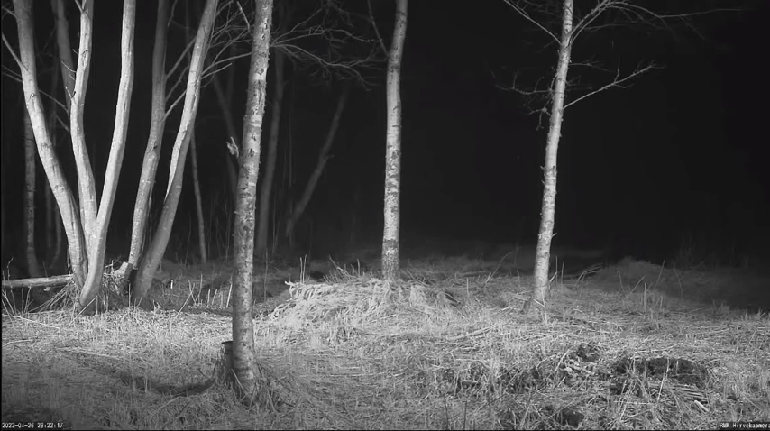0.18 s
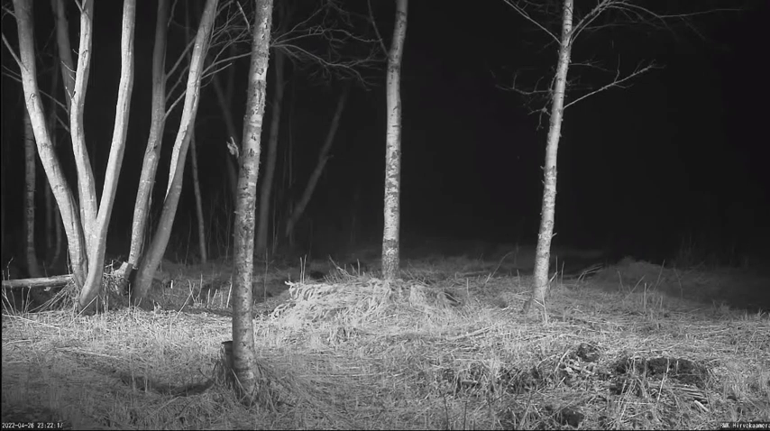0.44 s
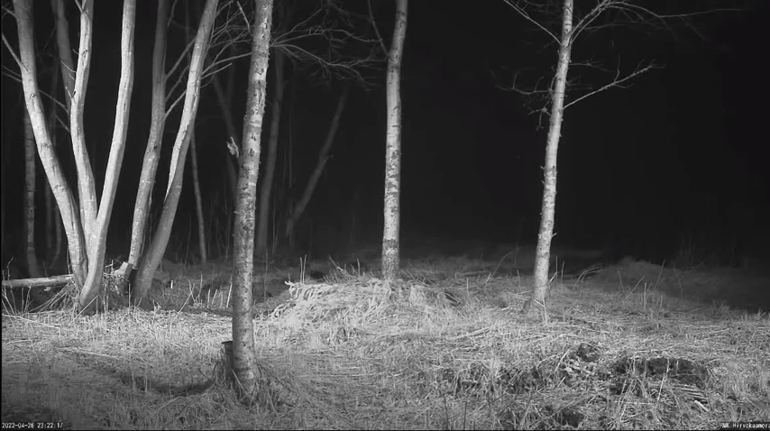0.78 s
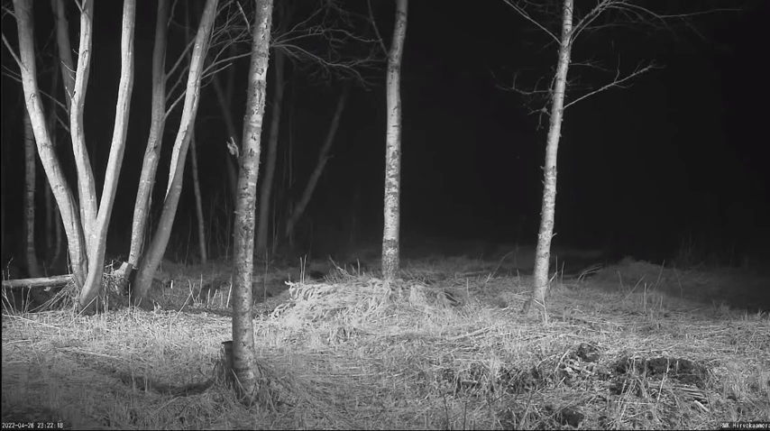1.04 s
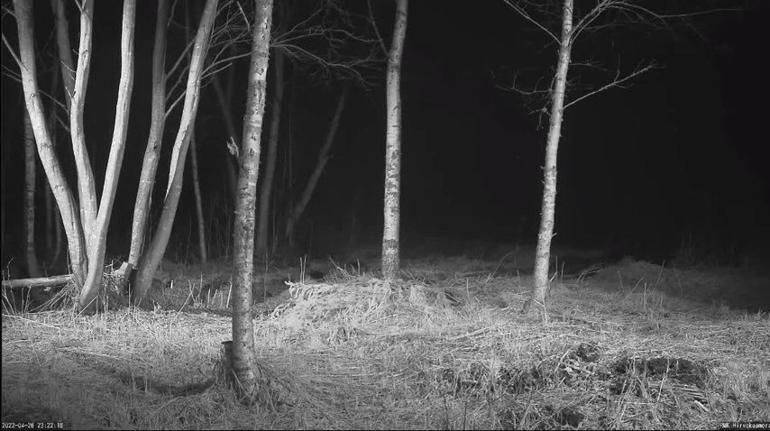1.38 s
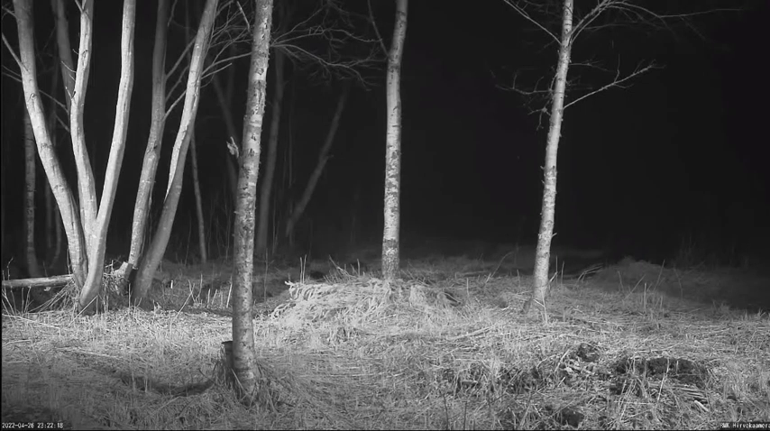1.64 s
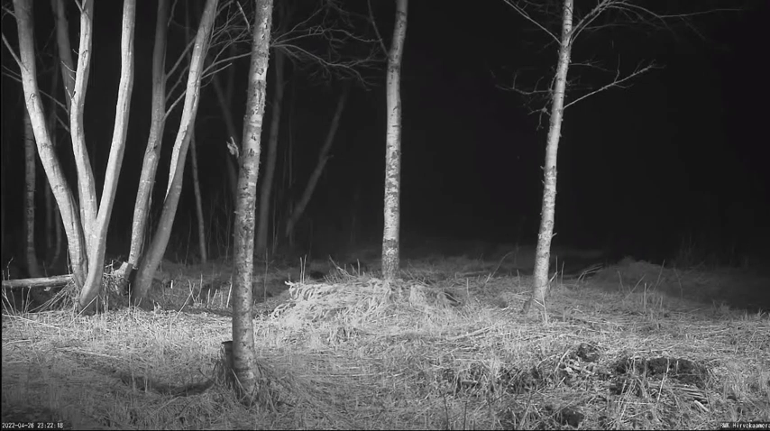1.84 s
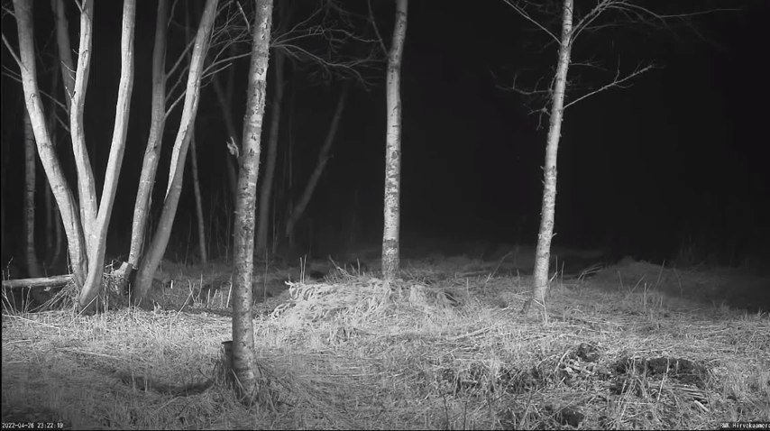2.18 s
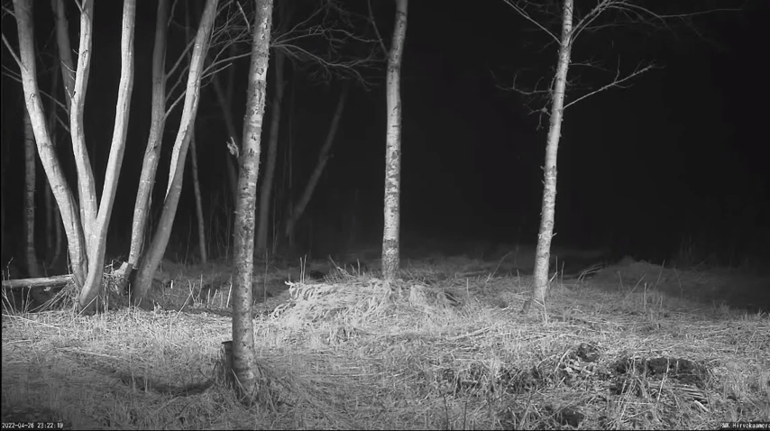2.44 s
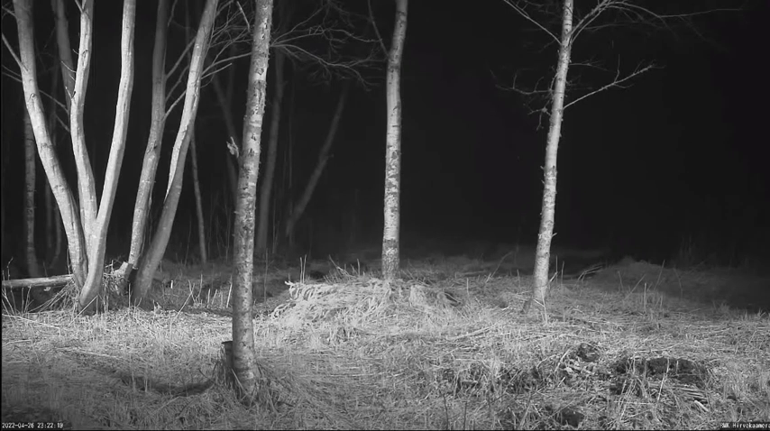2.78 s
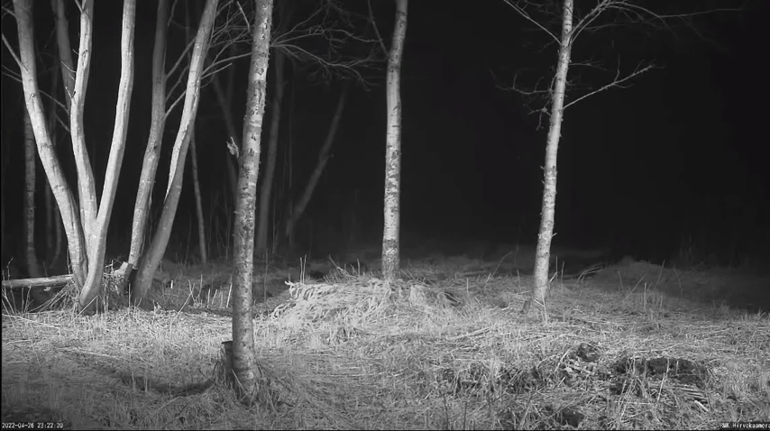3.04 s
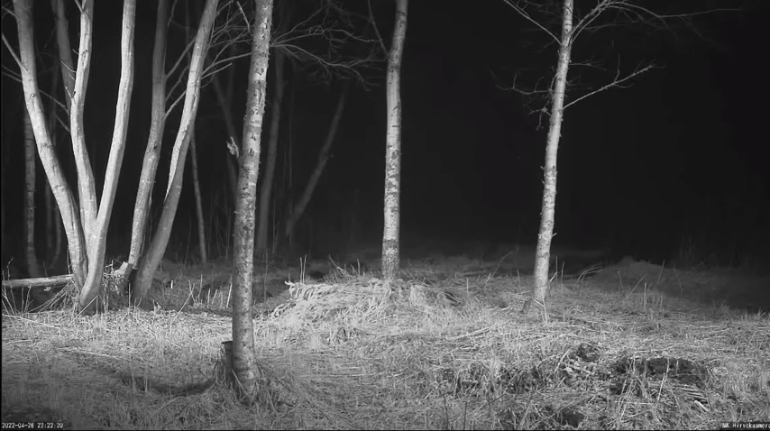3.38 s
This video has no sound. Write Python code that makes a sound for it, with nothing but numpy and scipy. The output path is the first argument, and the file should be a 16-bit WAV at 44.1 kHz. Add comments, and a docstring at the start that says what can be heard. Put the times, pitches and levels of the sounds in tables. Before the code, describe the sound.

Wolf pack yelping, yipping and barking in a chaotic chorus, echoing through a quiet night forest

```python
"""A faint, distant chorus over hiss comes first, then the clear yelps of a wolf pack in a night forest.
The pack yips, yelps and barks some way off from the microphone of a small outdoor camera.
Nearer calls are gliding sums of overtones drawn from curves, some with a thin whistle above.
The rest of the pack is many random arched calls; decaying noise taps make the echo of the trees."""
import sys
import numpy as np
from scipy import signal
from scipy.fft import rfft, irfft
from scipy.io import wavfile
from scipy.ndimage import uniform_filter1d

SR = 44100
rng = np.random.default_rng(int(sys.argv[2]) if len(sys.argv) > 2 else 0)


def wav_out(sig):
    """Save sig, one row per channel (or a flat mono array), as 16-bit PCM at SR to the path in sys.argv[1]."""
    wavfile.write(sys.argv[1], SR, np.round(np.clip(np.atleast_2d(sig).T, -1, 1) * 32767).astype(np.int16))


N = 154350  # 3.5 s


def amp(db):
    """Amplitude factor of a level in dB."""
    return 10 ** (np.asarray(db) / 20)


def evened(x):
    """Scales a sound to rms 1."""
    return x / np.sqrt(np.mean(x ** 2) + 1e-20)


def read(points, hz):
    """Reads a table over frequency, straight between points on a logarithmic axis."""
    f, value = np.transpose(points)
    return np.interp(np.log(hz + 1), np.log(f + 1), value)


def add(mix, start_s, sound):
    """Lays a sound into the mix at its start time, cut at the end of the mix."""
    part = mix[max(round(start_s * SR), 0):][:len(sound)]
    part += sound[:len(part)]


def wobble(length, size):
    """Noise smoothed over a window of size samples, at rms 1."""
    noise = rng.standard_normal(length + size)
    return evened(signal.oaconvolve(noise, np.blackman(size + 1), "valid"))


# Spectrum shape of night air and microphone: (frequency [Hz], relative density [dB per Hz])
HISS_SHAPE = [(15, 9), (30, 1), (100, -5), (200, -9), (400, -3.5), (2500, -33), (4200, -23), (7000, -28),
              (16000, -31)]
HISS_DB = -57.5  # rms level


def hiss():
    """Steady noise of the night air and the microphone: white noise shaped over frequency."""
    hz = np.fft.rfftfreq(N, 1 / SR)
    spectrum = rfft(rng.standard_normal(N)) * amp(read(HISS_SHAPE, hz))
    return amp(HISS_DB) * evened(irfft(spectrum, N))


# Echo of the trees: (frequency [Hz], time to fall by 60 dB [s])
TREE_DECAY = [(400, 1.96), (1000, 1.98), (1600, 1.66), (2500, 0.69), (3200, 1.5), (4300, 0.88),
              (5500, 0.44)]
ECHO_DB, ECHO_RISE_S = -9, 0.025  # level of the nearer calls' echo; build-up of every echo


def trees(x):
    """Echoes scattered by the trees: dense noise taps that build up, then die band by band."""
    taps = rng.standard_normal(2 * SR)
    hz, t, bands = signal.stft(taps, SR, nperseg=256)
    t60 = np.maximum(read(TREE_DECAY, hz), .1)[:, None]
    tail = signal.istft(bands * amp(-60 * t / t60), SR, nperseg=256)[1]
    tail = tail * np.minimum(np.arange(len(tail)) / SR / ECHO_RISE_S, 1)
    return signal.fftconvolve(x, tail / np.linalg.norm(tail))[:len(x)]


# Colour of mouth, distance and microphone together: (frequency [Hz], relative level [dB])
PATH_COLOUR = [(200, -60), (300, -51.5), (450, -20), (650, -15.5), (1000, -6), (1450, -5), (2200, -23.5),
               (3000, -47.5), (3600, -51.5), (4300, -53.5), (5200, -70), (7000, -72)]
EDGE_S = .007  # fade at both ends of a call
JITTER = .02  # pitch jitter as a fraction of pitch, per unit of roughness
ROUGH_GROWTH = 1.4  # exponent: higher overtones are rougher


def voice(hz, level_db, tilt_db, rough, upper_db=0, count=12):
    """Overtones of a jittered pitch, each roughened by noise and coloured by the path."""
    jittered_hz = hz * (1 + JITTER * rough * wobble(len(hz), size=400))
    turns = np.cumsum(jittered_hz) / SR
    k = np.arange(1, count + 1)[:, None]
    # tilt is in dB per octave, upper_db in dB per overtone above the second
    gains = amp(read(PATH_COLOUR, k * hz) + tilt_db * np.log2(k) + upper_db * np.maximum(k - 2, 0))
    grit = np.array([1 + rough * n * wobble(len(hz), size=300) for n in (k / 2) ** ROUGH_GROWTH])
    grit = grit / np.sqrt((grit ** 2).mean(1, keepdims=True))
    tone = (gains * grit * np.cos(2 * np.pi * k * turns)).sum(0)
    tone = tone / np.sqrt((gains ** 2).sum(0) / 2 + 1e-20)  # the curve alone sets the level
    t = np.arange(len(hz)) / SR
    fade = np.sin(np.pi / 2 * np.clip(np.minimum(t, t[::-1]) / EDGE_S, 0, 1)) ** 2
    return tone * amp(level_db) * fade


# Level of the rest of the pack, farther away: (time [s], level [dB])
PACK_LEVEL = [(0.0, -39), (0.14, -42), (0.29, -40.5), (0.42, -39), (0.76, -33), (0.89, -32.5),
              (1.08, -30.5), (1.28, -31.5), (2.03, -36.5), (2.42, -35.5), (2.51, -39.5), (2.75, -36.5),
              (2.98, -33.5), (3.3, -38.5), (3.5, -38.5)]
PACK_PER_S, PACK_ROUGH = 20., .2  # calls per second; roughness
PACK_LOW_HZ, PACK_HIGH_HZ, PACK_ARCH = 401.1, 898.8, .2  # top pitch range; arch as fraction of pitch
PACK_SPREAD_DB, PACK_TILT_DB = -1, 1.  # calls vary by twice the spread; tilt per octave
PACK_SHORT_S, PACK_LONG_S = .06, .25  # call lengths
PACK_DRY_DB = -1  # direct sound against its echo


def far_calls(lead):
    """Many random arched calls, begun lead samples before the scene."""
    out = np.zeros(N + lead)
    for k, (when, pitch, duration, softness) in enumerate(rng.random((110, 4))):
        start = (k + when) / PACK_PER_S
        length = PACK_SHORT_S * (PACK_LONG_S / PACK_SHORT_S) ** duration
        # the first 4000 samples of the arch are skipped, so a call starts partway along it
        along = np.linspace(0, 1, 4000 + round(length * SR))[4000:]
        arch = np.sin(np.pi * along ** .8)
        top_hz = PACK_LOW_HZ * (PACK_HIGH_HZ / PACK_LOW_HZ) ** pitch
        hz = top_hz * (1 - PACK_ARCH + PACK_ARCH * arch)
        sound = voice(hz, PACK_SPREAD_DB * 2 * softness, PACK_TILT_DB, PACK_ROUGH, count=9)
        add(out, start, np.sqrt(abs(arch)) * sound)
    return out


def pack():
    """The rest of the pack blurred by the trees, its level following the table."""
    calls = far_calls(lead=SR)
    far = evened((amp(PACK_DRY_DB) * calls + trees(calls))[SR:])
    s, db = np.transpose(PACK_LEVEL)
    return far * amp(np.interp(np.arange(N) / SR, s, db))


def call(curve, rough, upper_db, count):
    """Sings one curve of pitch, level and, where given, overtone tilt; returns its start and sound."""
    s, hz, db, *tilt = np.transpose(curve)
    t = np.arange(s[0], s[-1], 1 / SR)
    hz, db = (uniform_filter1d(np.interp(t, s, v), size=400, mode="nearest") for v in (hz, db))
    tilt_db = np.interp(t, s, tilt[0]) if tilt else 0
    return s[0], voice(hz, db, tilt_db, rough, upper_db, count)


def chorus(curves, rough, upper_db, count):
    """Lays every call of one kind at its own time."""
    out = np.zeros(N)
    for curve in curves:
        add(out, *call(curve, rough, upper_db, count))
    return out


# Thin whistles above some yelps, one curve each: (time [s], pitch [Hz], level [dB])
WHISTLE_CURVES = [
    [(.14, 5640, -76), (.17, 5600, -69), (.22, 5560, -66), (.26, 5560, -74), (.34, 5580, -76)],
    [(.23, 5900, -78), (.27, 6100, -73), (.31, 5920, -70), (.36, 5700, -74), (.41, 5700, -80)],
    [(.88, 5150, -80), (.91, 5700, -71), (.94, 5870, -66), (.96, 5700, -69), (.985, 5300, -74)],
    [(1, 4950, -74), (1.03, 4930, -71), (1.08, 4940, -76)],
    [(1.09, 4000, -74), (1.12, 3900, -70), (1.16, 3900, -76)],
    [(2.89, 4150, -78), (2.96, 4250, -71), (3.05, 4330, -72), (3.13, 4300, -79)],
]


def whistles():
    """Single roughened gliding tones without overtones."""
    return chorus(WHISTLE_CURVES, rough=.5, upper_db=0, count=1)


# Lower, rougher barks and short howls, one curve each:
# (time [s], pitch [Hz], level before shade [dB], overtone tilt [dB per octave])
BARK_CURVES = [
    [(0.03, 487.7, -68.5, -2), (0.052, 554, -54, -17), (0.07, 573.4, -36, 6), (0.12, 524.5, -42, 3.5)],
    [(0.67, 555.0, -45, -0.5), (0.704, 628.5, -20, 0.5), (0.736, 604, -47.5, 9), (0.83, 613, -45, -5),
     (0.86, 614, -59.5, -8)],
    [(0.89, 472.3, -29.5, 7), (0.92, 520, -27, 6.5), (0.932, 483.6, -37, 11), (0.955, 416.7, -55, -4)],
    [(1.115, 639, -30, 7), (1.129, 654, -28, 4.5), (1.155, 658, -23.5, 9.5)],
    [(0.57, 463.4, -37.5, -1.5), (0.592, 501.4, -31.5, 15), (0.656, 501.7, -34.5, 4),
     (0.69, 574.5, -34, -3.5)],
    [(1.2, 317, -68, -13.5), (1.338, 322, -58, -19), (1.37, 332, -69.5, -21)],
    [(1.48, 707, -35, -1), (1.502, 684, -32.5, -9.5), (1.53, 605, -42.5, -1.5)],
    [(1.35, 635, -63.5, -13), (1.368, 648, -33, -18), (1.412, 643, -35, 3), (1.47, 672, -52, -13)],
    [(1.61, 447.8, -38.5, 1.5), (1.65, 423.2, -32, -4), (1.675, 413, -46, 2.5), (1.7, 454.3, -31.5, 6.5),
     (1.725, 463, -33, 12.5), (1.75, 462, -30, 6), (1.775, 394.3, -54.5, 4)],
    [(1.8, 370.6, -36.5, -8), (1.83, 444, -33, 2.5), (1.87, 456, -43.5, -1.5), (1.9, 418, -43, 13)],
    [(1.07, 489, -33.5, 2), (1.1, 446, -34.5, 6.5), (1.13, 443, -32.5, 18)],
    [(1.19, 535.6, -27.5, 8), (1.23, 549.5, -37.5, 10.5), (1.28, 528, -36, 16)],
    [(2.55, 501, -52.5, -10), (2.58, 510, -41.5, -4.5), (2.62, 496, -46, -9.5)],
    [(1.94, 521.5, -35.5, -5), (1.97, 519.6, -39.5, 8.5), (2.0, 440, -31, -3)],
    [(2.035, 526, -30, -2), (2.069, 512, -45, 13.5), (2.101, 480, -35, 5.5), (2.115, 496.0, -43.5, -5)],
    [(2.35, 433.8, -40.5, -3.5), (2.392, 511, -36, -3.5), (2.408, 490, -24, 6), (2.445, 518, -48, -3.5)],
    [(2.48, 374.3, -44.5, -18), (2.51, 498.6, -29, 9.5), (2.54, 539.5, -29.5, 7), (2.556, 532.6, -26, 6),
     (2.585, 390, -47.5, -10.5)],
    [(2.63, 487.7, -42, -11), (2.644, 537.8, -51.5, 2.5), (2.68, 522.3, -29.5, 10), (2.725, 480, -47, -8)],
]


def barks():
    """Low gliding calls with nine overtones, whose upper ones carry the most grit."""
    return chorus(BARK_CURVES, rough=.12, upper_db=0, count=9)


# High, nearly pure yelps, one curve each:
# (time [s], pitch [Hz], level before shade [dB], overtone tilt [dB per octave])
YELP_CURVES = [
    [(0.232, 1504, -24.5, 4), (0.24, 1520, -19.5, 12.5), (0.298, 1501, -26, 18.5), (0.316, 1460, -16.5, 3),
     (0.332, 1269, -17.5, 5), (0.368, 1226, -18, -3), (0.422, 1130, -22, 6.5), (0.53, 1105, -25.5, -2),
     (0.564, 929.5, -31, 5), (0.63, 878.4, -34, 10), (0.65, 882, -66.5, -26.5)],
    [(.935, 1600, -28, -8), (.96, 1570, -23, -8), (.98, 1535, -22, -2), (1.005, 1300, -20, 3),
     (1.02, 1150, -24, -6), (1.04, 920, -30, -12)],
    [(1.02, 950, -40, 10.5), (1.03, 924, -23.5, 10), (1.058, 859, -25.5, 10), (1.11, 701, -46, 18)],
    [(1.16, 810, -30, 6), (1.185, 838, -25, 6), (1.21, 790, -26, 6), (1.255, 690, -29, 6)],
    [(2.1, 1082, -49.5, 18), (2.112, 1127, -45.5, 10.5), (2.148, 1059, -36.5, 22.5), (2.22, 1104, -27, 1.5),
     (2.284, 1048, -40, 23.5), (2.296, 1061, -31.5, 3), (2.354, 1082, -45.5, 25), (2.37, 1130, -36, -5)],
    [(2.56, 1021, -40, 11), (2.59, 1079, -47, 8), (2.64, 1038, -41, 1)],
    [(0.14, 1545, -52.5, -1), (0.16, 1640, -38, 4.5), (0.225, 1544, -42.5, -3)],
    [(3.17, 1394, -48, 3), (3.228, 1314, -36, 0), (3.24, 1370, -41, -5)],
    [(3.27, 939, -42, 0), (3.308, 869, -47, -12), (3.34, 910, -41, -2)],
    [(2.265, 885, -32, -4.5), (2.285, 812, -33, 1.5), (2.33, 736, -34, 12)],
    [(2.736, 1457, -32, -5), (2.76, 1355, -27, -1.5), (2.8, 1340, -34.5, 2), (2.87, 1358, -41, -7)],
    [(2.76, 922, -50.5, 13), (2.784, 956, -25.5, 7.5), (2.81, 867, -42.5, -1), (2.825, 968, -50, 14.5)],
    [(2.872, 1115, -31, -0.5), (2.89, 1338, -27.5, -3.5), (2.91, 1443, -17.5, -2.5), (2.93, 1446, -18, 7.5),
     (2.955, 1366, -21.5, 10.5), (2.975, 1231, -29.5, 11.5), (2.995, 1080, -21.5, 1)],
    [(2.98, 915, -69.5, 3), (2.988, 869, -24, 12), (3.04, 895, -36.5, 6), (3.085, 733, -28, 12)],
    [(3.0, 1275, -26, 3), (3.04, 1434, -41.5, 28), (3.088, 1407, -34.5, -5), (3.158, 1510, -60, 15),
     (3.262, 1404, -55, 16.5), (3.33, 1410, -62, 0)],
    [(3.37, 1400, -38, -3), (3.44, 1397, -43, -5), (3.484, 1476, -33.5, 10), (3.5, 1360, -38, -2)],
]


def yelps():
    """High gliding calls with few overtones, which weaken steeply above the second."""
    return chorus(YELP_CURVES, rough=.12, upper_db=-17, count=4)


# Trunks and undergrowth dull the direct sound more than its echo: (frequency [Hz], gain [dB])
UNDERGROWTH = [(500, 0), (1700, 0), (2300, -2), (2700, -9), (3300, -10), (4000, -14), (6000, -14)]


def shaded(x):
    """Direct sound past trunks and undergrowth, which take away its treble."""
    return irfft(rfft(x) * amp(read(UNDERGROWTH, np.fft.rfftfreq(N, 1 / SR))), N)


def scene():
    """Hiss, the far pack, and the nearer calls with their echo; whistles arrive unshaded."""
    background = hiss() + pack()
    thin = whistles()
    near = barks() + yelps()
    direct = shaded(near) + thin
    echo = amp(ECHO_DB) * trees(near + thin)
    return (background + echo + direct)[None]


def record(dry):
    """The band limit: a steep low-pass at 15730 Hz."""
    lowpass = signal.firwin(1023, 15730, window=("kaiser", 9), fs=SR)
    return signal.oaconvolve(dry, lowpass[None], "same")


dry = scene()
out = record(dry)
wav_out(out)
```